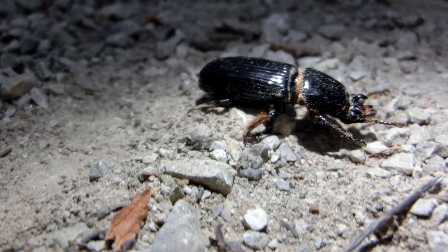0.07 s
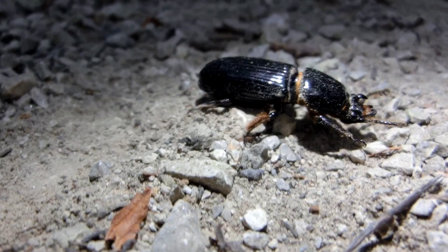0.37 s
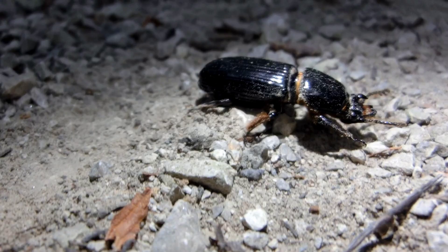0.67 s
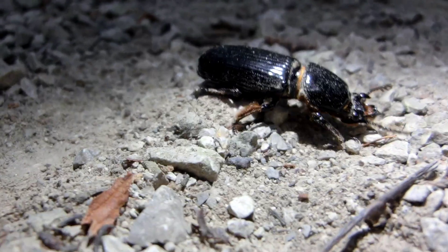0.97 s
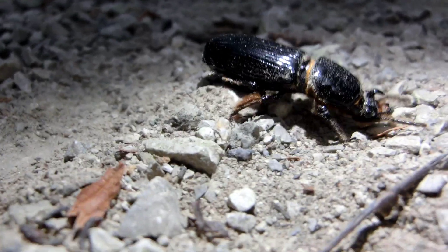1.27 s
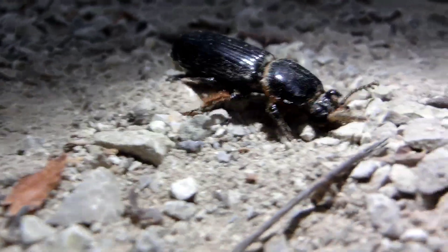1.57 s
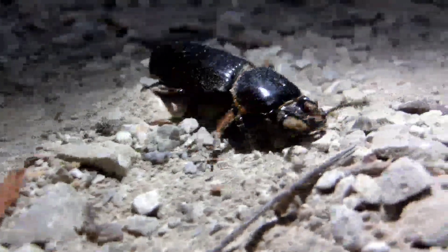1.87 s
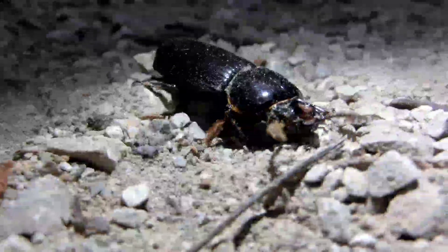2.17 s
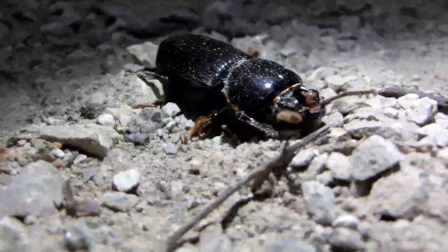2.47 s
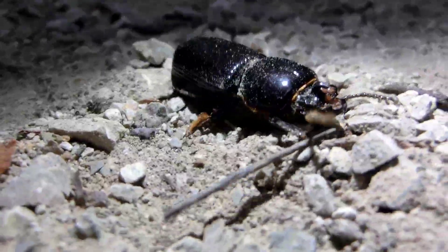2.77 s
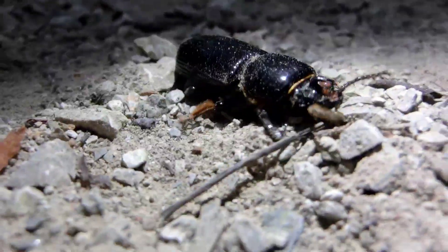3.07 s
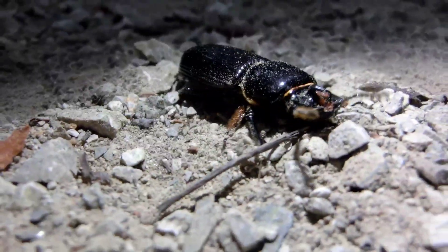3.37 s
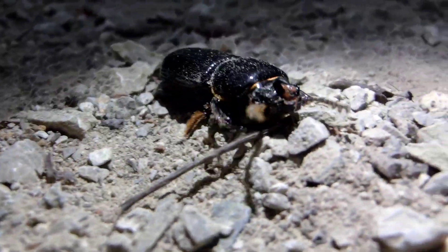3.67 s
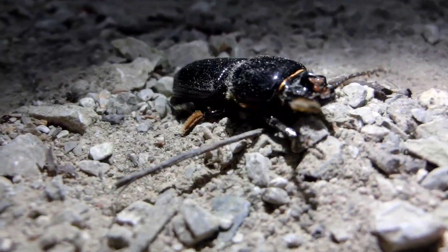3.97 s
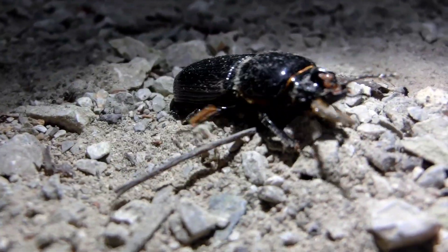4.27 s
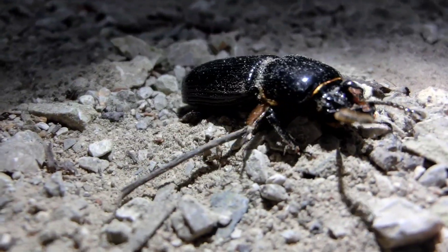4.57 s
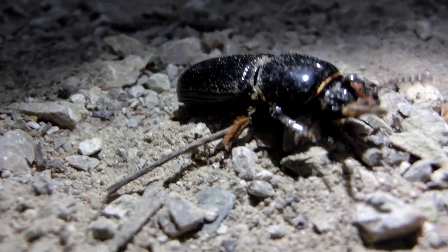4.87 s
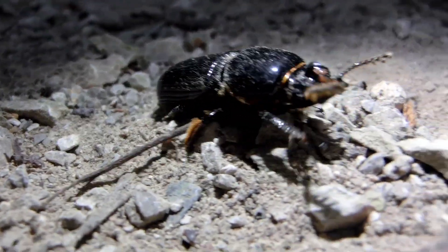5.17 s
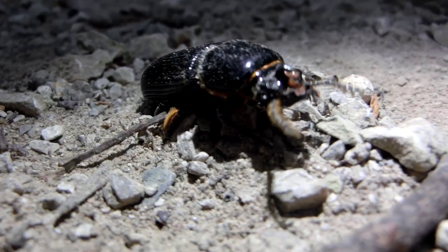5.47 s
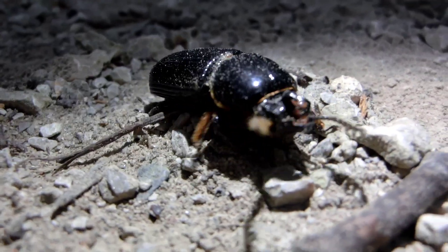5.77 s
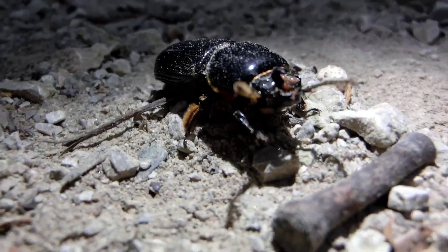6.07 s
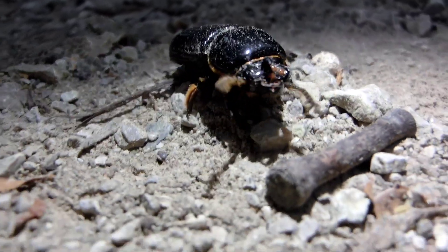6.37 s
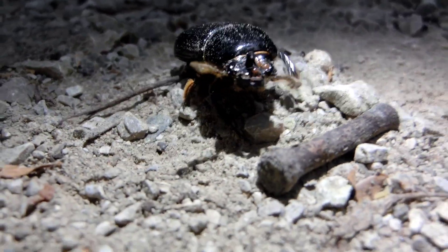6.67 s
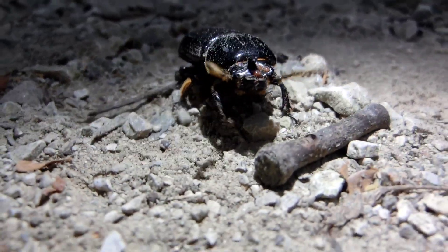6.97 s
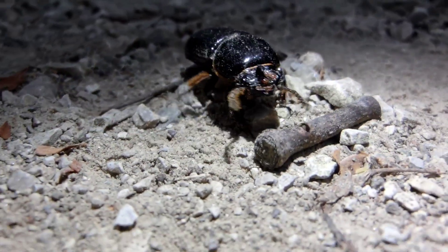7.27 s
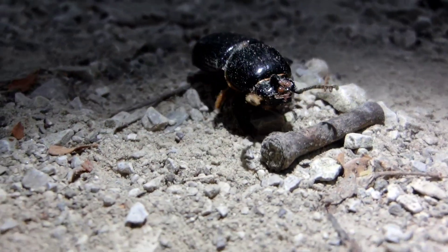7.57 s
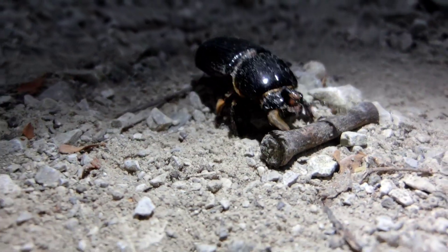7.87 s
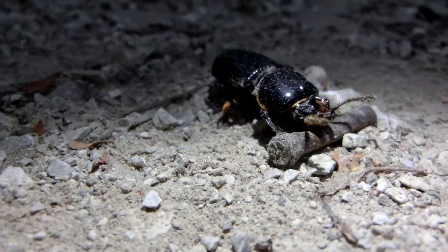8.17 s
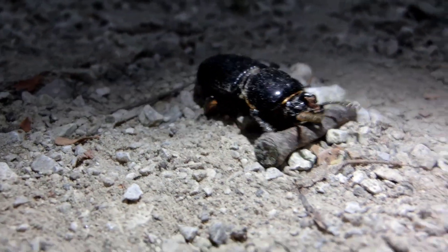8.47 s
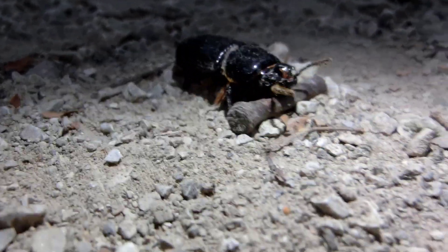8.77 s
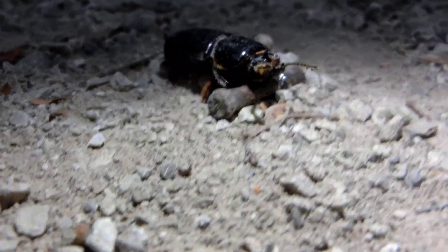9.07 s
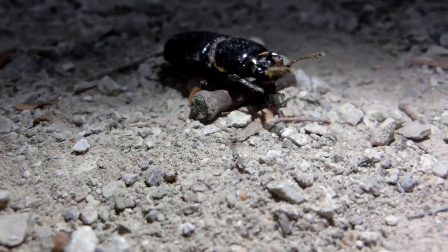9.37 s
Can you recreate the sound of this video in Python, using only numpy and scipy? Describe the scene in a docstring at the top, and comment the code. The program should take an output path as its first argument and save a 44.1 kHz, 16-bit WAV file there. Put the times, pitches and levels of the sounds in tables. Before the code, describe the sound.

Outdoors at night, a far engine hums low and insects trill faintly. Close by, a beetle's legs click and crackle through grit and small stones. Four brief, high squeaks, each dipping slightly in pitch, come from the beetle with a slight echo: one near the start, a pair past the middle, and the last after its claws lightly scratch a stick.

```python
"""A large beetle on dry gravel at night. After 0.74 s of silence, a far engine drones and insects trill.
From 1 s the beetle's feet tick and scuff the grit close by. At 1.6, 5.5 and 6.1 s it squeaks by drawing
a file across a scraper under its wing cases. From 7.1 s its claws scrape a dry stick, and at 8.4 s it
squeaks a fourth time. The surroundings answer the beetle with a short echo."""
import sys
import numpy as np
from scipy import signal
from scipy.fft import rfft, irfft, next_fast_len
from scipy.io import wavfile
from scipy.ndimage import map_coordinates

SR = 44100
rng = np.random.default_rng(int(sys.argv[2]) if len(sys.argv) > 2 else 0)


def unload_wav(signal):
    """Save mono or channel-first audio to the path in sys.argv[1] as 16-bit WAV at rate SR, clipped to [-1, 1]."""
    wavfile.write(
        sys.argv[1],
        SR,
        np.round(np.clip(np.atleast_2d(signal).T, -1, 1) * 32767).astype(np.int16),
    )


N = 415422


def amp(db):
    """Turn decibels into a gain."""
    return 10 ** (np.asarray(db) / 20)


def unit(x):
    """Scale x to an average (rms) level of 1."""
    return x / np.sqrt(np.mean(x ** 2) + 1e-20)


def along(points, hz):
    """Read between (frequency, value) points on a log frequency axis."""
    freqs, values = np.transpose(points)
    return np.interp(np.log(hz + 1), np.log(freqs + 1), values)


def curve(points):
    """Join (time, value) points with straight lines, one value per sample."""
    return np.interp(np.arange(N) / SR, *np.transpose(points))


def wobble(rate, size=N):
    """A smooth random curve through `rate` points a second."""
    points = rng.standard_normal(int(size * rate / SR) + 4)
    return map_coordinates(points, [np.arange(size) * rate / SR])


def swells(rows, rise_s=.04, fall_s=.055):
    """Gain for (start, length, level) rows: each rises until its start, holds, then dies away."""
    t = np.arange(N) / SR
    gains = [amp(db) * np.exp(-np.maximum(start - t, 0) / rise_s
                              - np.maximum(t - start - length, 0) / fall_s)
             for start, length, db in rows]
    return np.max(gains, axis=0)


def filtered(x, response):
    """Scale each frequency in x by response(hz)."""
    size = x.shape[-1]
    padded = next_fast_len(size + 2 ** 12)
    return irfft(rfft(x, padded) * response(np.fft.rfftfreq(padded, 1 / SR)), padded)[..., :size]


def coloured(x, spectrum):
    """Give x a tone colour, with a filter that rings only after each click, never before it."""
    size = 2 ** 9
    cepstrum = irfft(np.log(amp(along(spectrum, np.fft.rfftfreq(size, 1 / SR)))))
    cepstrum[1:size // 2] *= 2
    cepstrum[size // 2 + 1:] = 0
    pulse = irfft(np.exp(rfft(cepstrum)))
    return signal.oaconvolve(x, pulse[None] / np.linalg.norm(pulse), axes=1)[:, :x.shape[1]]


# How alike left and right sound: (frequency [Hz], likeness [0 to 1])
LIKENESS = [(60, 0.8), (130, 0.9), (290, 0.95), (640, 0.98), (1410, 0.95), (3100, 0.9), (6820, 0.33),
            (15000, 0.022)]


def stereo(pair, likeness=LIKENESS):
    """Mix two unrelated signals into a left and a right that are partly alike."""
    def weights(hz):
        angle = np.arccos(np.clip(along(likeness, hz), -1, 1)) / 2
        return np.array([np.cos(angle), np.sin(angle)])
    mid, side = filtered(pair, weights)
    return np.array([mid + side, mid - side])


def noise(spectrum, size=N):
    """Stereo noise with the given tone colour, at an average level of 1."""
    white = stereo(rng.standard_normal((2, size)))
    return unit(filtered(white, lambda hz: amp(along(spectrum, hz))))


# Tone colours of the far rumble and of the hiss: (frequency [Hz], relative level [dB])
RUMBLE_COLOUR = [(20, -12.5), (45, -4.5), (80, -1), (108, 3), (140, -2.5), (190, -0.5), (320, -12.5),
                 (400, -4.5), (520, -10.5), (640, -1.5), (730, -11.5), (820, -7), (950, -12.5), (1250, -13),
                 (1700, -23.5), (4000, -34)]
HISS_COLOUR = [(1000, 10.5), (2500, -3.5), (4000, -0.5), (5600, -12), (6900, 11), (8500, 2.5), (10500, 8.5),
               (14200, 11), (16000, -8)]
# Swells of a thin, high sizzle: (start [s], length [s], level [dB])
SIZZLE_SWELLS = [(3.6, 0.48, -51), (7.25, .45, -58)]


def night(rumble_db=-40, hiss_db=-49.5, trill_db=-59):
    """Far rumble, soft hiss, a sizzle that swells twice, and the thin trill of distant insects."""
    rumble = amp(rumble_db + 0.83 * wobble(8)) * noise(RUMBLE_COLOUR)
    hiss = amp(hiss_db) * noise(HISS_COLOUR)
    sizzle = noise([(9500, -48), (12000, 2), (13800, -3), (14800, 3), (15800, -39)])
    sizzle *= swells(SIZZLE_SWELLS, rise_s=1, fall_s=.15)
    trill_colour = [(6200, -50), (6900, -16), (7350, 4), (7560, 11), (7750, -50), (8200, -50)]
    trill = amp(trill_db + 1.9 * wobble(40)) * noise(trill_colour)
    return (rumble + hiss + sizzle + trill) * amp([[.4], [-.4]])  # a little to the left


# Loudness of the engine's firing note, and of the octave above it: (time [s], relative level [dB])
FIRING_LEVELS = [(0.76, -32.5), (0.95, -28.5), (1.26, -34), (1.36, -50), (1.48, -33), (1.67, -28),
                 (2.37, -44.5), (2.59, -32.5), (3.02, -40.5), (3.09, -46), (3.33, -32), (3.55, -48),
                 (3.72, -31.5), (5.47, -31), (5.93, -47), (6.22, -34.5), (6.41, -41), (6.7, -30.5),
                 (8.29, -38), (8.44, -50), (8.61, -36), (8.84, -31), (8.94, -41.5), (9.4, -46)]
OCTAVE_LEVELS = [(0.76, -54.5), (1.5, -45), (1.58, -39.5), (2.23, -53.5), (2.44, -42.5), (2.73, -55),
                 (2.88, -46), (3.33, -55), (4.56, -43.5), (5.98, -51), (7.31, -40), (7.54, -52),
                 (8.58, -44.5), (9.4, -53)]
# The engine's weaker overtones: (multiple of the firing rate, level [dB])
ENGINE_OVERTONES = [(3, -61), (4, -60.5), (5, -56.5)]


def engine(firing_hz=125.9, sink_hz_per_s=.42, hum_hz=110, hum_db=-50):
    """A far engine: its slowly sinking note swells, fades and beats against a fainter, lower hum."""
    rate = firing_hz - sink_hz_per_s * np.arange(N) / SR + 0.389 * wobble(3)
    phase = 2 * np.pi * (np.cumsum(rate) / SR + 0.015 * wobble(14))
    drone = amp(curve(FIRING_LEVELS) + wobble(28)) * np.sin(phase)
    drone += amp(curve(OCTAVE_LEVELS) - 1 + 1.8 * wobble(13)) * np.sin(2 * phase + 0.29 * wobble(12))
    for multiple, db in ENGINE_OVERTONES:
        drone += amp(db + 2.8 * wobble(4)) * np.sin(multiple * phase + 0.48 * wobble(18))
    hum_gain = amp(hum_db + 2.8 * wobble(1.96))
    hum = hum_gain * np.sin(2 * np.pi * np.cumsum(hum_hz + 2 * wobble(3.1)) / SR)
    return np.sqrt(2) * (drone + hum) * amp([[.35], [-.35]])


# How long the echo lasts: (frequency [Hz], time to fade by 60 dB [s])
ECHO_FADES = [(500, .5), (3000, .6), (8000, .35), (16000, .15)]


def echo(x):
    """The surroundings throw the sound back; each frequency dies away at its own speed."""
    hz, t, spectrum = signal.stft(rng.standard_normal((2, SR // 2)), SR, nperseg=256)
    fade = amp(-60 * t / along(ECHO_FADES, hz)[:, None])
    tail = stereo(signal.istft(spectrum * fade, SR, nperseg=256)[1])
    delayed = np.pad(x.mean(0), (SR // 128, 0))
    return signal.fftconvolve(delayed[None], tail / np.linalg.norm(tail[0]), axes=1)[:, :N]


# Claws dragging over a dry stick: (start [s], length [s], level [dB])
CLAW_SCRAPES = [(7.1, .12, -49.5), (7.7, 0.11, -63), (8.09, 0.28, -51.5)]
# How the stick rings: (frequency [Hz], relative level [dB])
STICK_COLOUR = [(1200, -45), (1700, -23), (1870, 0), (1970, -5), (2150, -14), (3000, -25)]


def claws_on_stick():
    """Claws catch on the bark as the beetle climbs, and the wood rings with a thin scrape."""
    bark = noise(STICK_COLOUR) * amp(2.5 * wobble(60))
    return swells(CLAW_SCRAPES) * unit(bark)


def grains(per_s, scatter_db, fade_s=.0065):
    """The jumpy loudness of tiny grains touching at random, some harder than others."""
    count = int(per_s * N / SR)
    sizes = amp(scatter_db * np.minimum(rng.exponential(size=count), 3))
    hits = np.bincount(rng.integers(0, N, count), sizes ** 2, N)
    power = signal.oaconvolve(hits, amp(-120 * np.arange(SR // 64) / SR / fade_s))[:N]
    return unit(np.sqrt(np.abs(power)))


# A leg drags: (start [s], length [s], relative grit level [dB], relative sand level [dB])
LEG_DRAGS = [(1.009, 0.18, -56, -46), (1.395, 0.17, -52.5, -45.5), (1.62, 0.34, -56.5, -50),
             (2.116, 0.29, -59.5, -50), (2.774, 0.19, -59, -53), (3.08, 0.062, -52.5, -45),
             (3.426, .08, -56, -46), (3.541, 0.049, -53, -42), (3.774, 0.04, -58, -46),
             (4.925, 0.72, -59.5, -50), (5.719, .2, -57, -47.5), (6.023, .22, -49, -46.5),
             (6.305, 0.18, -54, -49), (6.874, 0.046, -54, -46.5), (7.093, 0.11, -46, -45),
             (7.615, .3, -52.5, -52), (8.036, 0.12, -55, -58), (8.381, 0.38, -53.5, -50),
             (9.297, 0.23, -58, -68)]


def scuffing(grit_boost_db=3, resting_grit_db=-66.5, resting_sand_db=-56):
    """Dragging legs roll coarse grit and fine sand, and never quite come to rest."""
    grit_gain = swells([(start, length, db) for start, length, db, _ in LEG_DRAGS])
    grit_gain = amp(grit_boost_db) * (grit_gain + amp(resting_grit_db))
    sand_gain = swells([(start, length, db) for start, length, _, db in LEG_DRAGS])
    sand_gain = np.maximum(sand_gain, amp(resting_sand_db))
    shared = 0.29 * grains(per_s=130, scatter_db=6.5)  # these sound in both grit and sand

    def crackle(colour):
        white = stereo(rng.standard_normal((2, N)))
        contacts = shared + .5 * grains(per_s=290, scatter_db=3)
        return coloured(unit(white * contacts), colour)
    grit = crackle([(300, -3.5), (1000, -25), (1900, 6), (2600, 3.5), (3600, -6), (5200, -9),
                    (7000, -3), (12000, -33)])
    sand = crackle([(2000, -3), (4800, -5.5), (6800, 1.5), (8500, 1), (10500, 2.5), (13500, -6.5),
                    (16000, -23)])
    return grit_gain * grit + sand_gain * sand


def nudged_stones(per_s=8, boost_db=(8.5, 4, 2), scatter_db=4):
    """Dragging legs bump lesser stones at random; gives extra rows of footfalls."""
    rows = []
    for start, length, grit_db, sand_db in LEG_DRAGS:
        for _ in range(round(per_s * length)):
            levels_db = np.add([grit_db, sand_db, sand_db], boost_db)
            levels_db += scatter_db * rng.standard_normal(3)
            rows.append((start + length * rng.random(), *levels_db))
    return rows


# The sharpest steps on stones, in relative levels: (time [s], knock [dB], snap [dB], tick [dB])
FOOTFALLS = [(1.046, -44, -33.5, -31), (1.113, -47, -35, -34), (1.1575, -50, -42, -34),
             (1.165, -36, -46, -51), (1.2142, -39, -36, -55), (1.2351, -56, -34, -46),
             (1.2432, -26, -31, -31), (1.259, -31, -30, -32), (1.2763, -31.5, -32, -45),
             (1.2874, -42, -28.5, -29), (1.303, -35, -32, -38), (1.3646, -27, -28, -28),
             (1.441, -44, -33, -32), (1.4746, -47, -34, -47), (1.5496, -41, -36, -48),
             (1.6483, -37, -24.5, -34), (1.8927, -34, -34, -26), (1.946, -39, -35.5, -31),
             (1.968, -38, -40, -32), (2.1875, -42, -37, -32), (2.2997, -43, -42, -41),
             (2.8116, -38, -37, -36), (2.88, -35, -28.5, -38), (3.1187, -48, -34, -37),
             (3.1404, -36, -33, -31), (3.2186, -38, -39, -39), (3.2802, -33.5, -37.5, -42),
             (3.3794, -28, -32, -36), (3.4125, -30.5, -35, -33), (3.4337, -39, -35, -30),
             (3.4485, -47, -37, -41), (3.4716, -37, -28, -21), (3.4818, -39, -36, -31),
             (3.4932, -30.5, -36, -33), (3.5573, -35, -25, -23), (3.577, -40, -28, -26),
             (3.5897, -34, -47, -45), (3.6684, -40, -33.5, -37), (3.7654, -35.5, -38, -40),
             (4.6909, -41, -39, -55), (4.9644, -34, -37, -40), (5.0967, -30.5, -34, -42),
             (5.176, -34, -41, -39), (5.3241, -43, -41, -38), (5.424, -42, -36.5, -40),
             (5.4603, -36, -38, -39), (5.7608, -46, -36, -44), (5.83, -37, -36, -44),
             (5.8905, -36, -35, -54), (5.9254, -44, -37, -53), (5.9802, -27.5, -36, -30),
             (6.031, -37, -38, -36), (6.0497, -46, -37, -25.5), (6.0732, -28, -30, -26),
             (6.0965, -42, -38, -28), (6.192, -41, -40, -34), (6.2423, -35, -37, -49),
             (6.3351, -33, -46, -45), (6.8724, -51, -43, -32), (6.9245, -32.5, -42, -35),
             (7.0689, -29.5, -44, -39), (7.0992, -28, -39, -29), (7.1159, -27, -43, -43),
             (7.1237, -33, -37, -33), (7.1565, -28, -42, -35), (7.1735, -34, -38, -32),
             (7.1985, -30, -39, -40), (7.2101, -36, -34, -27.5), (7.3565, -29.5, -41, -45),
             (7.6371, -37, -52, -51), (7.6701, -32, -44, -37), (7.6843, -29, -42, -46),
             (7.6928, -39, -40, -40), (7.715, -20, -30, -24.5), (7.751, -45, -37, -33),
             (7.8966, -35, -51, -54), (7.9844, -26, -35, -39), (8.0368, -33, -49, -52),
             (8.341, -30, -37, -47), (8.3887, -31, -36, -39), (8.6439, -36, -38, -39),
             (8.699, -37, -41, -37), (8.8785, -40.5, -38, -40), (8.9613, -32.5, -60, -57)]
# A stone's low knock, bright snap and very high tick: (frequency [Hz], relative level [dB])
KNOCK_COLOUR = [(200, -22), (900, -7), (1400, -3), (1900, 1), (2600, 0), (3400, -12), (7000, -40)]
SNAP_COLOUR = [(2400, -15), (3700, 6), (5000, -2), (6900, 12.5), (8500, -3), (11500, -26)]
TICK_COLOUR = [(6500, -18.5), (9000, -0.5), (10500, 0.5), (13000, -4.5), (16000, -7.5)]


def footsteps(boost_db=18.5, attack_s=.00033, snap_fade_s=.0035, crumb_db=-23, crumb_fade_s=.016):
    """Each foot grinds a stone for an instant, then snaps it against its neighbours; crumbs follow."""
    out, lead_in = np.zeros((2, N + SR)), SR // 128
    t = np.arange(-lead_in, SR // 32) / SR
    since_snap = np.maximum(t - .0005, 0)
    attack = 1 - np.exp(-since_snap / attack_s)
    crumbs = amp(crumb_db - 60 * since_snap / crumb_fade_s)
    for time, *levels_db in [*FOOTFALLS, *nudged_stones()]:
        fade_s = snap_fade_s * np.exp(0.11 * rng.standard_normal())
        snap = (amp(-60 * since_snap / fade_s) + crumbs) * attack
        grind = amp(-28 - 60 * np.abs(t) / .02 + 4 * wobble(700, len(t)))
        for db, colour in zip(levels_db, (KNOCK_COLOUR, SNAP_COLOUR, TICK_COLOUR)):
            burst = coloured((snap + grind) * rng.standard_normal((2, len(t))), colour)
            click = stereo(burst, likeness=[(1500, 1), (3500, 0.97), (7000, 0.81), (15000, 0.13)])
            click /= np.linalg.norm(click.mean(0))
            out[:, round(time * SR) - lead_in:][:, :len(t)] += amp(db + boost_db) * click
    return out[:, :N]


def file_stroke(length, top_hz, speed_loss, speed_up_s=.0086, attack_s=.019, release_s=.021):
    """Teeth per second and pressure in one stroke: it speeds up at once, then tires and presses less."""
    t = np.arange(round(length * SR)) / SR
    tired = (t / length) ** 2.3
    rate = top_hz * (1 - 0.3 * np.exp(-t / speed_up_s)) * (1 - speed_loss * tired)
    fade_in_out = np.minimum(t / attack_s, 1) * np.minimum((length - t) / release_s, 1)
    return rate, fade_in_out * amp(-5 * tired ** 2)


# Overtones of the beetle's shell: (multiple of the tooth rate, relative level [dB])
SHELL_OVERTONES = [(2, -29), (3, -13), (4, 0), (5, -22), (6, -22), (7, -24), (8, -15), (9, -24), (10, -13),
                   (11, -27), (14, -25), (15, -28), (16, -29)]
# How much louder the squeak is on the left: (frequency [Hz], left minus right [dB])
LEFT_LOUDER = [(2500, 1.3), (3300, 0), (6600, -1.5), (8200, -7.5), (12000, 0)]
# How far the left side's wave runs ahead: (frequency [Hz], lead [radians])
LEFT_AHEAD = [(2500, -.05), (3300, -.47), (5500, -.3), (6600, -1.5), (8200, -1.7)]


def shell_tone(rate, teeth, rough, slow, ring_db, shine_db, shell_hz=3208, width_hz=65):
    """The plucked shell whistles, loudest as the fourth overtone slides through the shell's own note."""
    size, side = len(rate), np.array([[.5], [-.5]])
    in_tune = np.exp(-((4 * rate - shell_hz) / width_hz) ** 2)
    tone = np.zeros((2, size))
    for k, db in SHELL_OVERTONES:
        hz = k * rate.mean()
        db += (k != 4) * (2.6 * wobble(40, size) - 1)  # weak overtones swell and fade on their own
        db += (k == 4) * (ring_db - 5.5 * (1 - in_tune))
        db -= (k < 4) * 1.5 * rough
        db -= (k > 4) * (1 + 3.5 * slow)  # high ones thin out when the file is slow
        db += (k > 9) * shine_db
        flutter_db = 1.4 * (1 + rough) * wobble(129.6, size)
        gain = amp(db + flutter_db + side * along(LEFT_LOUDER, hz))
        blur = .065 * wobble(200, size) + (k > 4) * (.35 + .8 * slow) * wobble(300, size)
        phase = 2 * np.pi * (k * teeth + rng.random()) + side * along(LEFT_AHEAD, hz)
        tone += gain * np.sin(phase + blur)
    return np.sqrt(2) * tone


# Strokes of the file: (start [s], length [s], top speed [teeth/s], speed lost by the end [0 to 1],
# relative level [dB], boost of the shell's ring [dB], boost of overtones above the ninth [dB])
FILE_STROKES = [(1.624, 0.31, 845, 0.17, -28.5, 2, 1), (5.488, 0.34, 833.6, 0.13, -30, 2, 1),
                (6.148, 0.32, 834.4, 0.13, -29.5, 2, -1.5), (8.413, .32, 844.6, 0.18, -29.5, -0.5, -10)]
# The file's dry rasp: (frequency [Hz], relative level [dB])
RASP_COLOUR = [(1200, -32), (2300, -19), (3100, -11), (4000, 15.5), (6000, -1), (8300, 12), (10000, 3),
               (16000, -52)]


def squeaks(catch_hz=767.5, catch_width_hz=27):
    """A fast file plucks its teeth evenly and whistles; slower, the scraper catches and turns hoarse."""
    out = np.zeros((2, N))
    for start, length, top_hz, speed_loss, db, ring_db, shine_db in FILE_STROKES:
        rate, pressure = file_stroke(length, top_hz, speed_loss)
        size = len(rate)
        rough = np.exp(-(np.maximum(rate - catch_hz, 0) / catch_width_hz) ** 2)
        slow = np.clip((825 - rate) / 60, 0, 1)
        # each tooth comes a little early or late
        jitter = (.005 + .008 * slow) * wobble(170, size) + .03 * rough * wobble(500, size)
        teeth = np.cumsum(rate) / SR + jitter
        tone = shell_tone(rate, teeth, rough, slow, ring_db, shine_db)
        rasp = amp(-27 + 9 * np.maximum(rough, slow / 2)) * noise(RASP_COLOUR, size)
        rasp *= 1 + np.cos(2 * np.pi * teeth)  # one pulse for each tooth
        friction = amp(-24) * noise(HISS_COLOUR, size)
        force = pressure * amp(db + wobble(37, size))
        out[:, round(start * SR):][:, :size] += force * (tone + rasp + friction)
    return out


def scene():
    """The beetle close by with its echo, and the engine and the night behind it."""
    voice = squeaks()
    feet = footsteps() + scuffing() + claws_on_stick()
    echoes = echo(amp(-16) * voice + amp(-19) * feet)
    return voice + feet + echoes + engine() + night()


def record(dry, start_s=.744, top_hz=16000):
    """Keep silent until start_s, and cut everything above top_hz."""
    fade_in = np.clip((np.arange(N) / SR - start_s) / .004, 0, 1)
    return filtered(dry * fade_in, lambda hz: hz < top_hz)


dry = scene()
out = record(dry)
unload_wav(out)
```